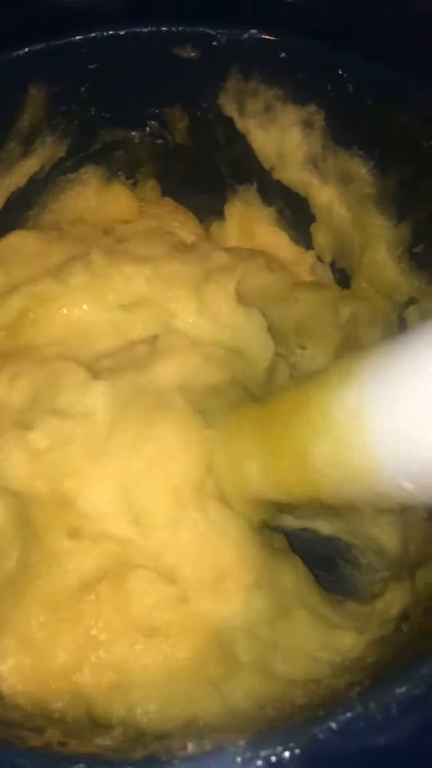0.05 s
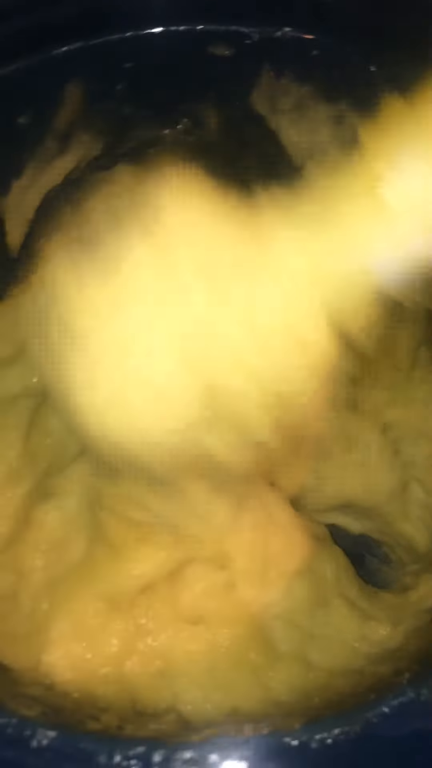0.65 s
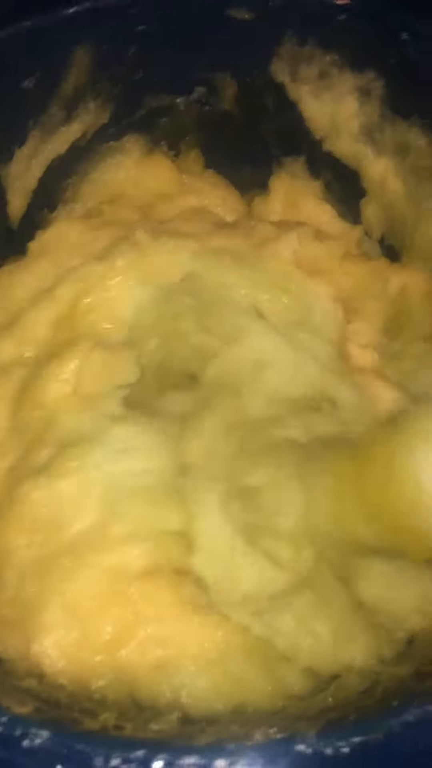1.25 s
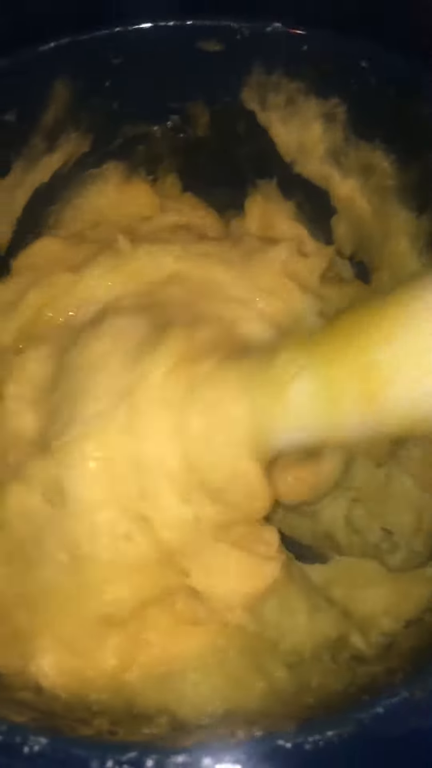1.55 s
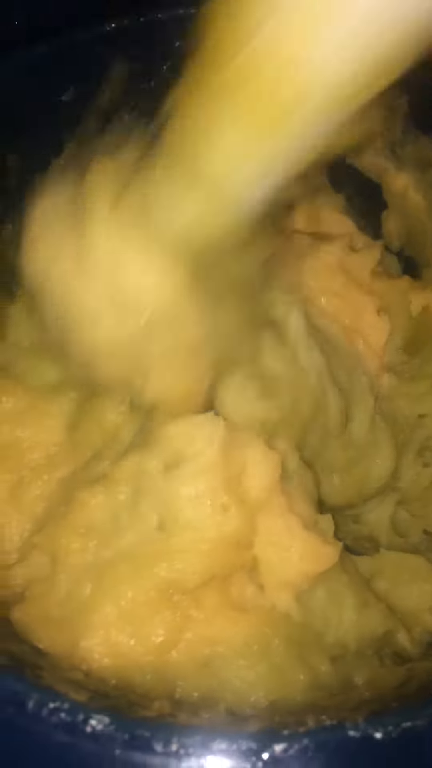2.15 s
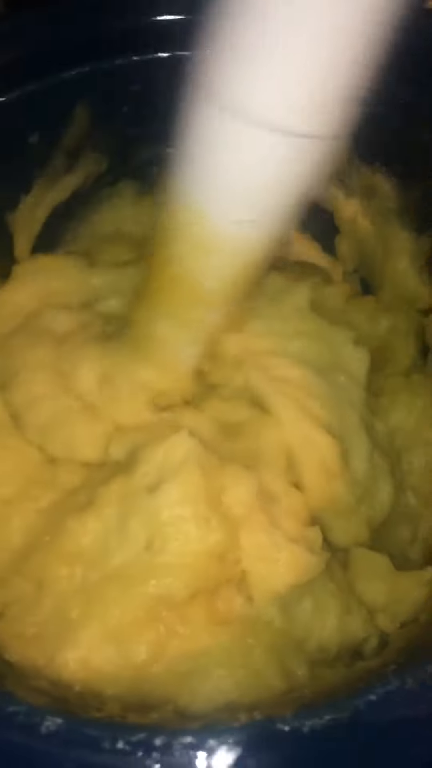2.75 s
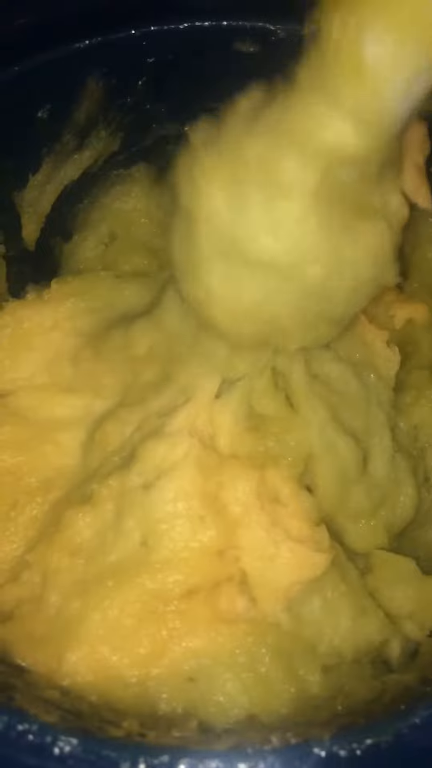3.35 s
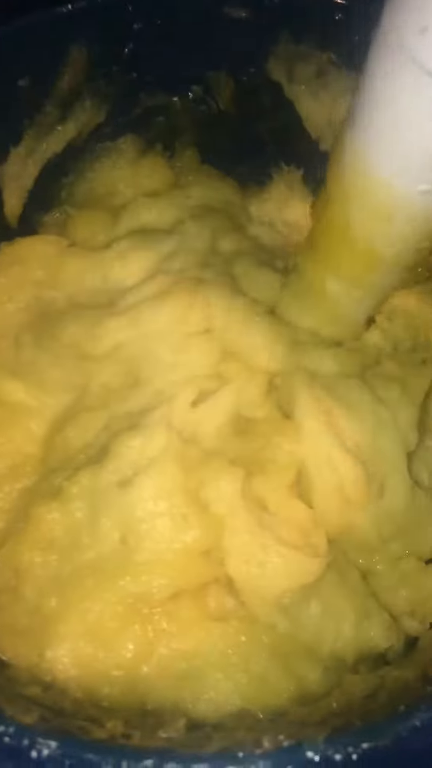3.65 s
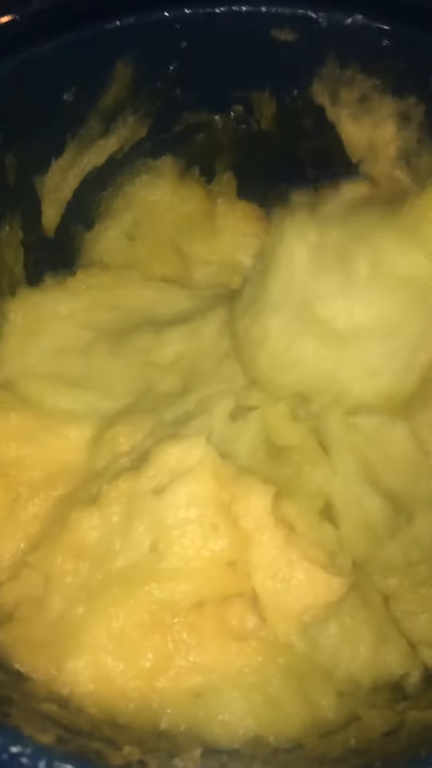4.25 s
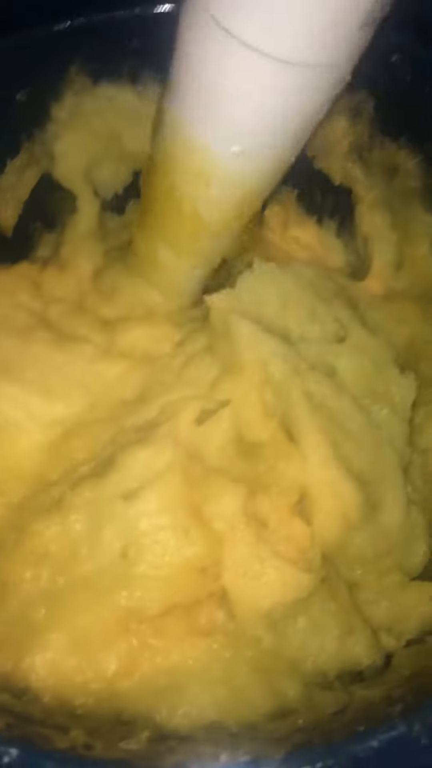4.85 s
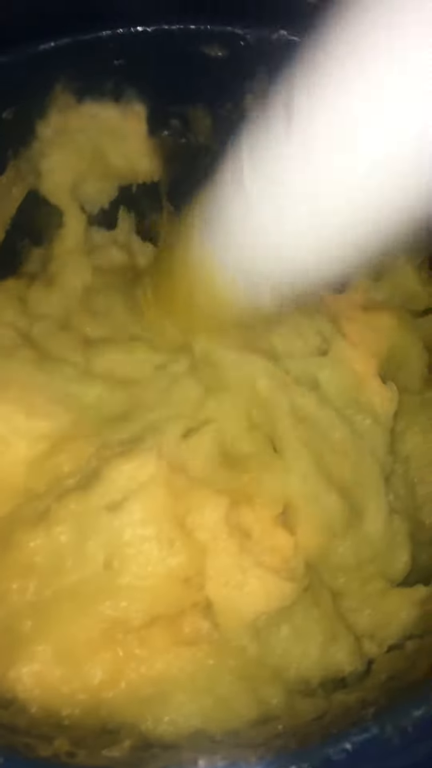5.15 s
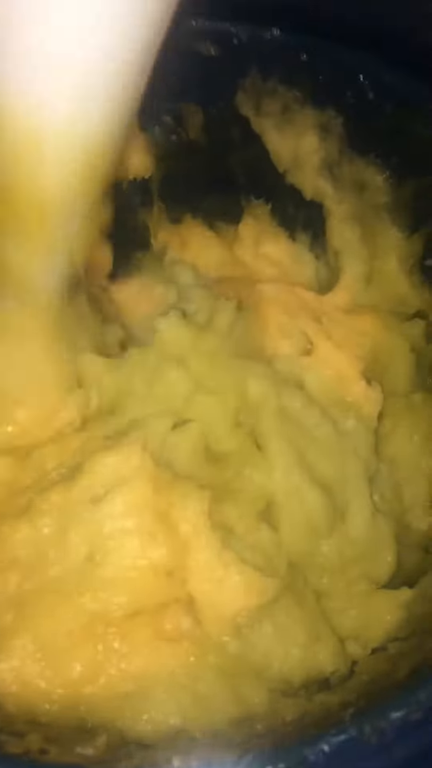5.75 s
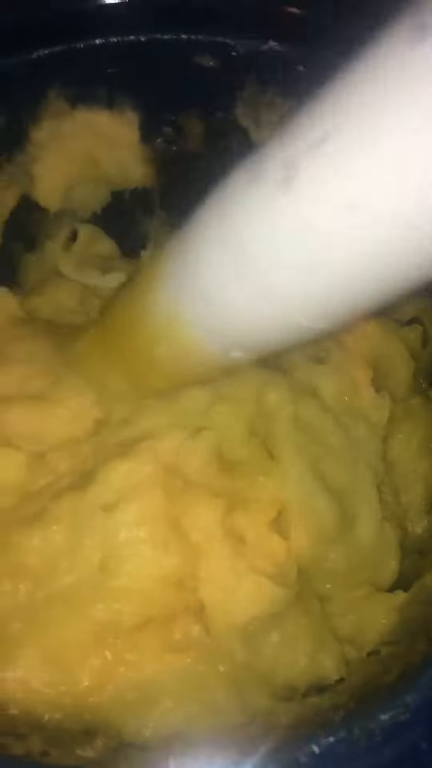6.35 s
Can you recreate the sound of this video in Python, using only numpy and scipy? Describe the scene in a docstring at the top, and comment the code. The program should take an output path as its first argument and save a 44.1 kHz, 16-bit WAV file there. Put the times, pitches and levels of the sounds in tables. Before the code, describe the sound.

A hand blender pulses six times, about once a second, buzzing under the load of thick paste and coasting to a stop each time. Dull knocks of its plastic head on the pot and faint wet snaps fall among the pulses. Towards the end the motor sounds thinner, the knocks turn harder, and a short squelch and plop finish it. The microphone is close, in a kitchen with little echo.

```python
"""A stick blender hums in a pot of stiff paste, close by in a kitchen: the first of six short bursts.
Each is rotating machinery under load: shaft and blades sound harmonics of the turning rate, the
rotor slots whine and the brushes hiss, until friction brakes the motor.
Impacts of the head excite the damped modes of pot and shaft, and the paste snaps, smacks and
crackles as it tears, ringing the air cavities inside it."""
import sys
import numpy as np
from scipy import signal
from scipy.fft import rfft, irfft, next_fast_len
from scipy.io import wavfile
from scipy.ndimage import map_coordinates

SR = 44100
rng = np.random.default_rng(int(sys.argv[2]) if len(sys.argv) > 2 else 0)


def waveform_to_disk(signal):
    """Save audio, clipped to [-1, 1], as 16-bit WAV at the path in sys.argv[1]."""
    frames = np.transpose(np.atleast_2d(signal))
    scaled = np.clip(frames, -1, 1) * 32767
    samples = np.round(scaled).astype(np.int16)
    wavfile.write(sys.argv[1], SR, samples)


N = 290619
TIME = np.arange(N) / SR


def amp(db):
    """Decibels to amplitude ratio."""
    return 10 ** (np.asarray(db) / 20)


def unit(x):
    """Normalisation to rms 1."""
    return x / np.sqrt(np.mean(x ** 2) + 1e-20)


def noise(samples=N):
    """Gaussian white noise."""
    return rng.standard_normal(samples)


def wobble(rate):
    """Random modulation: a spline through rate knots a second."""
    knots = noise(int(N * rate / SR) + 4)
    coarse = np.arange(0, N, 32)
    return np.interp(np.arange(N), coarse, map_coordinates(knots, [coarse * rate / SR]))


def swell(t, centre, width):
    """Gaussian pulse of height 1."""
    return np.exp(-((t - centre) / width) ** 2)


def rise(t, time_constant):
    """Exponential approach to 1."""
    return 1 - np.exp(-t / time_constant)


def fade(t, t60):
    """Exponential decay by 60 dB in t60."""
    return np.exp(-np.log(1000) * t / t60)


def along(points, hz):
    """Interpolation of (frequency, value) points on a log frequency axis."""
    frequencies, values = np.transpose(points)
    return np.interp(np.log(hz + 1), np.log(frequencies), values)


def filtered(x, response):
    """Linear filtering: the spectrum times a frequency response."""
    size = next_fast_len(len(x) + 8192)
    return irfft(rfft(x, size) * response(np.fft.rfftfreq(size, 1 / SR)), size)[:len(x)]


def coloured(x, spectrum):
    """Spectral shaping, at rms 1."""
    return unit(filtered(x, lambda hz: amp(along(spectrum, hz))))


def resonance(hz, centre_hz, q):
    """Response of a damped oscillator, 1 at its centre."""
    return 1 / (1 + 1j * q * (hz / centre_hz - centre_hz / (hz + 1)))


def add(track, start_s, sound):
    """Superposition of a sound on the track."""
    part = track[max(round(start_s * SR), 0):][:len(sound)]
    part += sound[:len(part)]


def harmonics(orders, turns, waver_db, waver_hz, jitter_rad):
    """Harmonic series of the shaft rate, each partial modulated in level and phase; rms 1."""
    out = np.zeros(N)
    for order, db in orders:
        phase = 2 * np.pi * (order * turns + rng.random()) + jitter_rad * wobble(70)
        out += amp(db + waver_db * wobble(waver_hz)) * np.sin(phase)
    return unit(out)


# Motor bursts: (on [s], off [s], first shaft rate [Hz], last shaft rate [Hz], paste load [0-1],
# relative shaft wobble [dB], spray level [dB])
BURSTS = [(-.3, 0.166, 150.7, 136.3, .95, -30.5, -45), (.975, 1.487, 151, 140.5, .65, -26, -31),
          (2.312, 2.746, 151.7, 147, .45, -27.5, -39), (3.497, 3.866, 155, 144.5, .6, -25.5, -36),
          (4.711, 5.048, 150.5, 153, 0.1, -30.5, -56), (5.899, 6.133, 160, 156, .08, -27.5, -60.5)]
# Lumps drawn into the blade: (time [s], half length [s], added load [fraction of full load],
# change of shaft wobble [dB], rasp level [dB])
PASTE_LUMPS = [(1.23, 0.093, 0.069, 9, -33), (1.404, .08, .33, -9, -23)]
def motor_drive():
    """Inertia and friction set the shaft's motion; speed and load set the gain of each motor sound."""
    switch_s, spin_up_s, free_coast_s = 0.0058, 0.038, 0.37
    lump_load = sum(more * swell(TIME, s, width) for s, width, more, _, _ in PASTE_LUMPS)
    lump_db = sum(db * swell(TIME, s, width) for s, width, _, db, _ in PASTE_LUMPS)
    bursts = []
    for on, off, first_hz, last_hz, paste_load, shake_db, spray_db in BURSTS:
        age = np.maximum(TIME - on, 0)
        load = paste_load + lump_load
        started = np.clip(age / switch_s, 0, 1)
        spin_up = 1 - np.exp(-(age / spin_up_s) ** 0.78)
        stop_s = free_coast_s * (1 - 0.45 * np.interp(off, TIME, load))  # load shortens the run-down
        coast = np.clip(1 - (TIME - off) / stop_s, 0, 1) ** 2
        fresh_db = 3.5 * swell(age, 0.058, 0.15)  # the blade meets fresh paste, then digs a hollow
        cutting = started * coast ** 5
        bursts.append(dict(
            speed=spin_up * coast,  # fraction of full speed
            shaft_hz=spin_up * coast * np.interp(TIME, [on, off], [first_hz, last_hz]),
            strain=started * (1 - spin_up),  # current is largest before the shaft is up to speed
            shake=started * coast ** 2.7 * spin_up ** 3 * amp(shake_db + lump_db + fresh_db),
            beat=cutting * spin_up ** 3 * amp(-32 + 20 * load + fresh_db),
            throb=cutting * spin_up ** 2 * amp(-31.5 + 13.5 * load ** 2 + 1.43 * fresh_db),
            churn=cutting * amp(-30 + 0.44 * fresh_db),
            brush=started * np.tanh(0.95 * coast) * amp(-27 - 4 * load ** 2),
            whine=spin_up * np.tanh(0.63 * coast) * amp(-32 - 12 * load ** 2 + 2.4 * load * fresh_db),
            spray=started * coast * amp(spray_db) * swell(age, 0.11, 0.084)))
    drive = {key: sum(burst[key] for burst in bursts) for key in bursts[0]}
    drive["turns"] = np.cumsum(drive["shaft_hz"] * (1 + 0.002974 * wobble(35))) / SR
    drive["slack"] = np.clip(1 - drive["speed"], 0, 1)
    return drive


# Low and high blade overtones: (order [multiple of shaft rate], relative level [dB])
THROB_ORDERS = [(3, -5), (4, 2), (5, -10)]
GROWL_ORDERS = [(6, -7.5), (7, -2), (8, -2.5), (9, -25), (10, -9), (11, -4), (12, -1.5), (13, -9),
                (14, -19)]
def blade_hum(drive):
    """Periodic forcing: the shaft shakes once a turn; two blades beat the paste, adding overtones."""
    turns = drive["turns"]
    shake = harmonics([(1, 0)], turns, waver_db=3, waver_hz=18, jitter_rad=0.12)
    beat = harmonics([(2, 0)], turns, waver_db=-0.7, waver_hz=14, jitter_rad=0.092)
    throb = harmonics(THROB_ORDERS, turns, waver_db=3.5, waver_hz=13, jitter_rad=0.11)
    growl = harmonics(GROWL_ORDERS, turns, waver_db=3.5, waver_hz=18, jitter_rad=0.3)
    hum = amp(4) * drive["shake"] * shake + drive["beat"] * beat + drive["throb"] * throb
    return hum + drive["churn"] * drive["speed"] ** 2 * growl


# Spectra of churned paste and of the bumped pot: (frequency [Hz], relative density [dB])
CHURN_SPECTRUM = [(100, -10), (250, -1.5), (450, 7), (800, -3.5), (1300, 2.5), (1900, -2), (2400, -9),
                  (4000, -26.5)]
RUMBLE_SPECTRUM = [(20, -10), (40, 0), (90, 5), (200, -7.5), (400, -14), (900, -56)]
def churning(drive):
    """Amplitude-modulated noise: paste tears at every blade pass, and lumps of it bump the pot."""
    passes = 1 + 0.28 * np.cos(2 * np.pi * 2 * drive["turns"])
    tearing = drive["churn"] * (amp(-17.5) + amp(2) * np.sqrt(drive["strain"]))
    tearing += amp(-10) * drive["throb"] + amp(-15.5) * drive["brush"]
    slosh = coloured(noise() * passes * amp(1.95 * wobble(250)), CHURN_SPECTRUM)
    bumps = coloured(noise() * amp(3.2 * wobble(13)), RUMBLE_SPECTRUM)
    return tearing * slosh + amp(-10) * drive["shake"] * bumps


# Successive harmonics of the slot rate: (relative level [dB])
SLOT_LEVELS = [0, 1, -1, -1, -1]
# Radiation of the small housing, weak in the bass: (frequency [Hz], gain [dB])
HOUSING_RESPONSE = [(500, -30), (1000, -2), (1800, 2), (3600, 1), (4300, -3), (5100, 5), (5900, -1),
                    (7200, 0), (9000, -2), (12000, -3)]
def rotor_whine(drive, slots=12):
    """Slot-passing tones with sidebands one shaft rate away, roughened by bearing rattle."""
    orders = [(slots * k + side, db + side_db) for k, db in enumerate(SLOT_LEVELS, 1)
              for side, side_db in [(-1, -9), (0, 0), (1, -7)]]
    jitter = 0.22 + 5 * drive["slack"] + 2 * drive["throb"]
    tones = harmonics(orders, drive["turns"], waver_db=3, waver_hz=20, jitter_rad=jitter)
    rattle = 1 + (0.04 + 2.1 * np.sqrt(drive["slack"])) * wobble(260)
    return drive["whine"] * coloured(tones * rattle * drive["speed"], HOUSING_RESPONSE)


def commutator_scrape(drive):
    """Sliding friction: the brushes ride the same rough track at every turn."""
    track = noise(256)
    return map_coordinates(track, [drive["turns"] % 1 * len(track)], mode="grid-wrap") * drive["speed"]


# Spectrum of the brush hiss: (frequency [Hz], relative density [dB])
BRUSH_SPECTRUM = [(900, 3), (1900, 3), (2300, -14), (2700, 2), (3100, -6.5), (3600, 0.5), (4200, -1.5),
                  (5200, 0), (7600, -0.5), (8600, 2), (9600, -3), (11900, -4), (13300, -14), (15400, -55)]
def brushes(drive, scrape):
    """Contact noise: brushes spark more at high current and chatter in their holders at middle speeds."""
    spark_db = 3.25 * wobble(300) + 2 * np.cos(2 * np.pi * drive["turns"]) + 7.4 * drive["strain"]
    hiss = amp(-1) * coloured(1.32 * scrape + noise() * amp(spark_db), BRUSH_SPECTRUM)
    chatter = unit(filtered(noise(), lambda hz: resonance(hz, 10800, q=5.5) ** 2))
    chatter *= amp(3 + 2 * wobble(14)) * drive["speed"] * drive["slack"]
    return drive["brush"] * (hiss + chatter)


def pot_walls(x):
    """Comb filtering: quick echoes between the walls of the pot ripple the spectrum."""
    echoes = np.zeros(SR // 150)
    echoes[0] = 1
    echoes[rng.integers(SR // 2000, len(echoes), size=10)] = 0.2 * rng.choice([-1, 1], size=10)
    return np.convolve(x, echoes / np.linalg.norm(echoes))[:N]


# Spectrum of the quiet kitchen: (frequency [Hz], relative density [dB])
AMBIENT_SPECTRUM = [(20, -18), (55, 11.5), (120, 4), (200, -6.5), (450, -6.5), (1300, -15.5), (4000, -25),
                    (11500, -26), (15400, -39)]
def ambient_noise():
    """Stationary noise: a faint, mostly low background."""
    return amp(-51.5) * coloured(noise(), AMBIENT_SPECTRUM)


def ring(modes, t, scatter_db, detune):
    """Free vibration: damped modes, a little different at every blow, with a 1 ms onset."""
    out = np.zeros(len(t))
    for hz, db, t60 in modes:
        gain = amp(db + scatter_db * rng.normal())
        mode_hz = hz * (1 + detune * rng.normal())
        out += gain * fade(t, t60) * np.sin(2 * np.pi * mode_hz * t)
    return out / np.abs(out).max() * rise(t, 0.001)


# Modes of the full pot and the plastic shaft and head: (frequency [Hz], relative level [dB], t60 [s])
POT_MODES = [(64, -33, 0.08), (98, -2.5, 0.13), (121.6, 1, 0.073), (183, -4, 0.065), (254, -8.5, 0.08),
             (327.3, 2, 0.053)]
HEAD_MODES = [(535, 3, 0.059), (563, 5.5, 0.041), (660, -24, 0.05), (944, 10, 0.036), (1220, -13, 0.018),
              (1830, -16, 0.0062)]
# Spectrum of hard contact: (frequency [Hz], relative density [dB])
CRACK_SPECTRUM = [(300, 3.5), (1000, -8), (2200, -0.5), (4000, -6.5), (6000, -7), (11000, -19),
                  (15000, -32)]
# Blows of the head on the pot: (time [s], thud level [dB], relative clack level [dB])
BLOWS = [(.374, -14.5, -40), (1.327, -2.5, -38), (1.718, -22, -67), (2.249, -20.5, -40.5), (2.486, -7, -34),
         (3.006, -8.5, -35.5), (3.646, -7.5, -34), (4.085, -11.5, -32), (4.71, -12, -14.5),
         (4.801, 1.5, -16.5), (5.334, -8, -30), (5.849, -13, -20.5), (5.96, -3, -15.5),
         (6.448, -6.5, -24.5)]
def thumps():
    """Impact excitation: the pot thuds, its hollow answers; through thin paste the head clacks too."""
    out, t = np.zeros(N), np.arange(SR // 4) / SR
    for s, thud_db, clack_db in BLOWS:
        thud = amp(thud_db) * ring(POT_MODES, t, scatter_db=-1, detune=0.065)
        clack = amp(clack_db + 12.5) * ring(HEAD_MODES, t, scatter_db=3, detune=0.017)
        hollow = amp(clack_db + 0.5) * coloured(noise(len(t)), CHURN_SPECTRUM)
        hollow *= rise(t, 0.0031) * fade(t, 0.071)
        # the crack grows faster than the clack as the contact hardens
        crack = amp(13.5 + 1.323 * clack_db) * coloured(noise(len(t)), CRACK_SPECTRUM)
        crack *= rise(t, 0.00063) * (fade(t, 0.017) + 0.17 * fade(t, 0.12))
        add(out, s, thud + clack + hollow + crack)
        # paste squashes under the head just before it lands
        squash = amp(thud_db - 27) * coloured(noise(len(t)), CHURN_SPECTRUM) * fade(t[::-1], 0.03)
        add(out, s - t[-1], squash)
    return out


def snap(hz, cycles):
    """Film rupture: a noisy ping of peak 1 that falls 60 dB in the given cycles."""
    t = np.arange(SR // 50) / SR
    ping = (np.sin(2 * np.pi * hz * t) + 0.5 * noise(len(t))) * fade(t, cycles / hz)
    return ping / np.abs(ping).max()


# The clearest films of paste snapping: (time [s], peak level [dB], frequency [Hz])
FILM_SNAPS = [(0.575, -34, 9400), (1.806, -24.5, 11700), (2.1367, -34, 3520), (3.2306, -24.5, 4700),
              (4.3287, -27, 14700), (5.378, -21.5, 10100), (5.8003, -26, 9100)]
def sticky_paste():
    """Shot noise: films burst at random under a few clear snaps, over faint smear and handling rumble."""
    out = np.zeros(N)
    for s, db, hz in FILM_SNAPS:
        add(out, s, amp(db) * snap(hz, cycles=44))
    for when, size, pitch in rng.random(size=(260, 3)):
        add(out, when * N / SR, amp(-47.5 + 9.9 * size ** 3) * snap(1500 * 7 ** pitch, cycles=24))
    smear = amp(-70 + 3.5 * wobble(12) + 3 * wobble(300)) * coloured(noise(), CRACK_SPECTRUM)
    handling = amp(-58 + 2 * wobble(7)) * coloured(noise(), RUMBLE_SPECTRUM)
    return out + smear + handling


def tear(cavity_hz, hold_s, t60):
    """Cavity resonance: air crackles through a tear in the paste and rings the hollow behind it."""
    t = np.arange(SR // 2) / SR
    flicker_db = 3.5 * wobble(359) + 2.5 * wobble(45)
    crackle = noise(len(t)) * amp(flicker_db[:len(t)])
    hollow = unit(filtered(crackle, lambda hz: resonance(hz, cavity_hz, q=0.57) ** 2 + 0.084))
    return hollow * rise(t, 0.0015) * fade(np.maximum(t - hold_s, 0), t60)


# Paste tearing open: (time [s], level [dB], cavity frequency [Hz])
PASTE_TEARS = [(.665, -33.5, 1620), (.764, -32.5, 1450), (0.941, -37, 2720), (1.891, -34, 1240),
               (2.0, -35, 1720), (2.957, -31.5, 1290), (3.227, -36.5, 3660), (4.681, -28.5, 930),
               (5.373, -35, 2000), (6.474, -33, 900)]
def smacks():
    """Transient excitation: each sudden tear sounds its cavity briefly."""
    out = np.zeros(N)
    for s, db, cavity_hz in PASTE_TEARS:
        add(out, s, amp(db) * tear(cavity_hz, hold_s=0.0021, t60=0.085))
    return out


# Air pockets opening: (time [s], frequency [Hz], level [dB], t60 [s], roughness [rad])
AIR_POCKETS = [(.768, 452, -37, 0.47, 0.08), (2.003, 445, -40, .3, .08), (4.089, 542, -30, 0.11, 1.2),
               (5.121, 3687, -20, 0.14, 1.1), (5.373, 1375, -20.5, 0.026, 1),
               (5.403, 1116, -19.5, 0.025, 1.34), (6.578, 494, -4.5, 0.022, .3)]
def air_pockets():
    """Damped resonance: pockets ring or squeak, phase-modulated by their fluttering soft walls."""
    out, t = np.zeros(N), np.arange(SR // 2) / SR
    for s, hz, db, t60, roughness in AIR_POCKETS:
        phase = 2 * np.pi * hz * t + roughness * wobble(542)[:len(t)]
        add(out, s, amp(db) * np.sin(phase) * rise(t, 0.00042) * fade(t, t60))
    return out


def spray(drive, scrape):
    """Narrow-band noise: spray whizzes off the blade near full speed, partly in step with its turns."""
    droplets = scrape + 1.4 * noise()
    return drive["spray"] * unit(filtered(droplets, lambda hz: resonance(hz, 10900, q=4.3) ** 2))


def lump_rasp(drive):
    """Forced resonance: the blade chops a lump once a turn and rings a hollow."""
    orders = [(order, 0) for order in range(5, 16)]
    chops = harmonics(orders, drive["turns"], waver_db=3.5, waver_hz=30, jitter_rad=0.45)
    rasp = unit(filtered(chops, lambda hz: resonance(hz, 1100, q=1)))
    envelope = sum(amp(db) * swell(TIME, s, width) for s, width, _, _, db in PASTE_LUMPS)
    return rasp * envelope * drive["speed"] ** 4


# The head dragging through paste: (time [s], length [s], relative level [dB], cavity frequency [Hz])
HEAD_DRAGS = [(3.057, 0.15, -48, 2600), (4.124, 0.18, -50, 1740), (5.402, .11, -44, 1840),
              (5.756, 0.092, -45.5, 1670), (6.49, 0.048, -25, 2830)]
def drags():
    """Sustained excitation: a long tear sounds its cavity while small bubbles burst."""
    out = np.zeros(N)
    for s, length, db, cavity_hz in HEAD_DRAGS:
        add(out, s, amp(db - 4) * tear(cavity_hz, hold_s=length, t60=0.023))
        for when, faintness, lowness in rng.random(size=(10, 3)):
            bubble = snap(cavity_hz * 0.18 ** lowness, cycles=43)
            add(out, s + when * length, amp(db + 13.5 - 26 * faintness) * bubble)
    return out


# Reverberation time of the kitchen: (frequency [Hz], t60 [s])
KITCHEN_T60 = [(100, 0.4), (1000, 0.37), (5000, 0.13), (14000, 0.25)]
def kitchen(x):
    """Reverberation: a short diffuse tail in which the treble dies first."""
    hz, t, spectra = signal.stft(noise(SR // 2), SR, nperseg=256)
    decay = fade(t, along(KITCHEN_T60, hz)[:, None])
    _, tail = signal.istft(spectra * decay, SR, nperseg=256)
    delayed = np.pad(x, (200, 0))
    return signal.fftconvolve(delayed, tail / np.linalg.norm(tail))[:N]


def scene():
    """Superposition of the direct sound of blender, pot and paste with the kitchen's diffuse field."""
    drive = motor_drive()
    scrape = commutator_scrape(drive)
    blender = blade_hum(drive) + churning(drive) + rotor_whine(drive) + lump_rasp(drive)
    blender += pot_walls(brushes(drive, scrape) + spray(drive, scrape))
    pot_and_paste = thumps() + sticky_paste() + smacks() + air_pockets() + drags()
    room = kitchen(amp(-17) * blender + amp(-9) * pot_and_paste)
    return (blender + pot_and_paste + room + ambient_noise())[None]


def record(dry):
    """Band limiting and saturation: deep bass is thinned, peaks clip and the top treble is cut."""
    bass_hz, top_hz = 32, 15500
    thinned = filtered(dry[0], lambda hz: (1j * hz / (1j * hz + bass_hz)) ** 2)
    return filtered(np.clip(thinned, -1, 1), lambda hz: hz < top_hz)[None]


dry = scene()
out = record(dry)
waveform_to_disk(out)
```